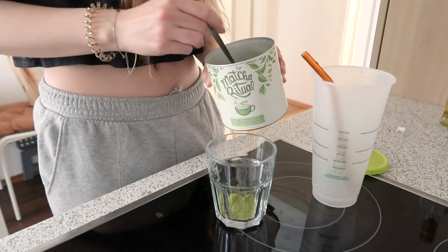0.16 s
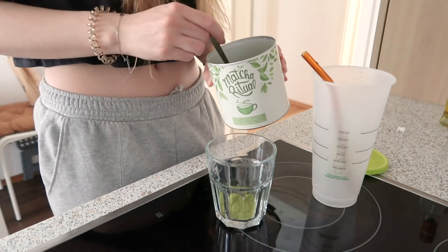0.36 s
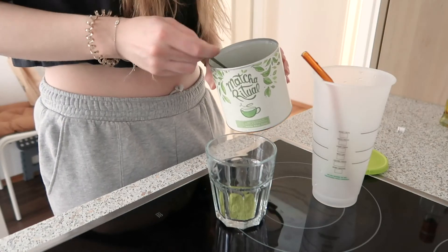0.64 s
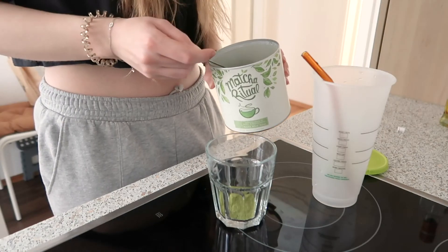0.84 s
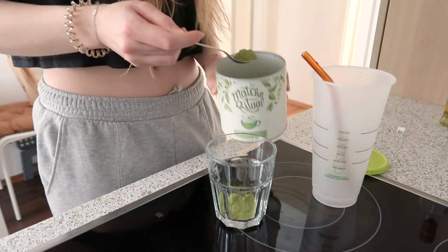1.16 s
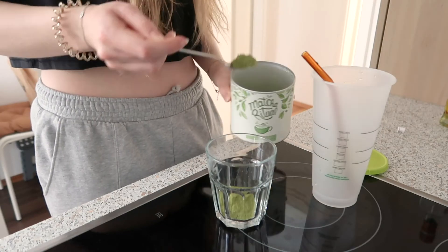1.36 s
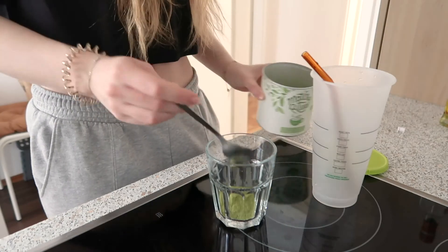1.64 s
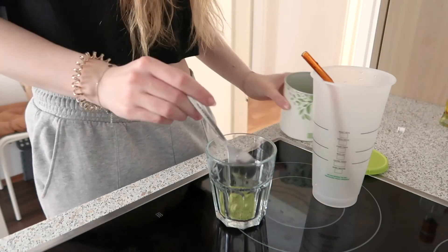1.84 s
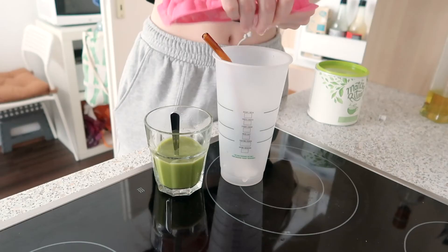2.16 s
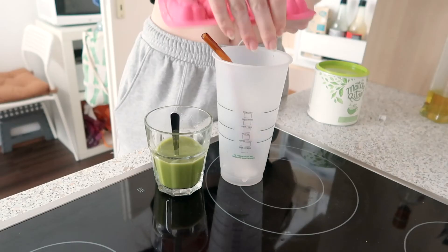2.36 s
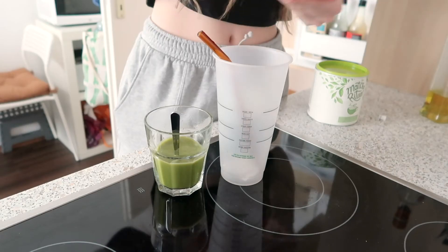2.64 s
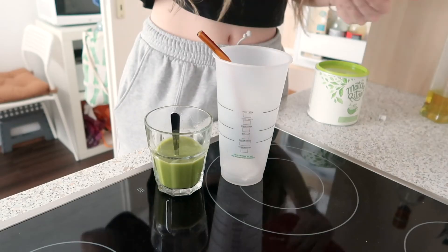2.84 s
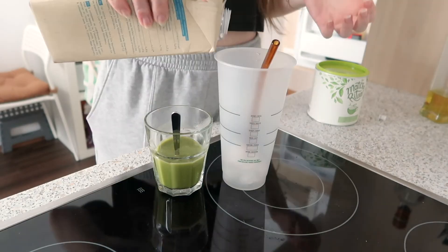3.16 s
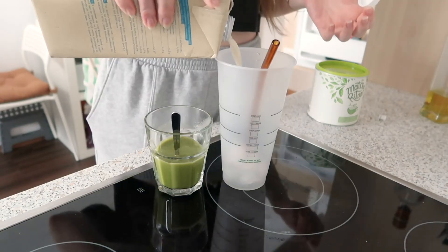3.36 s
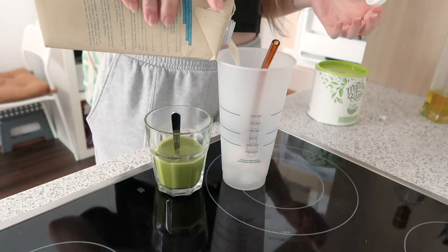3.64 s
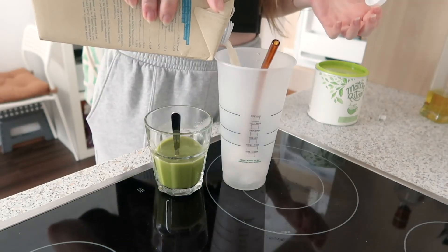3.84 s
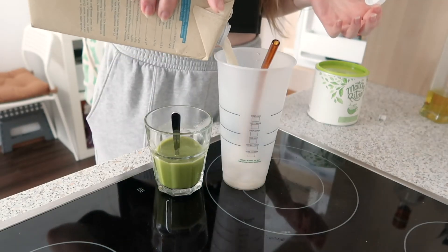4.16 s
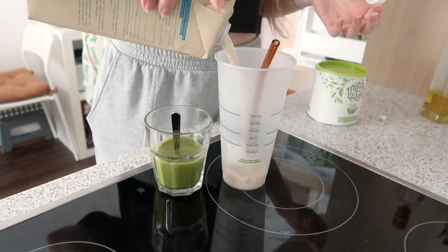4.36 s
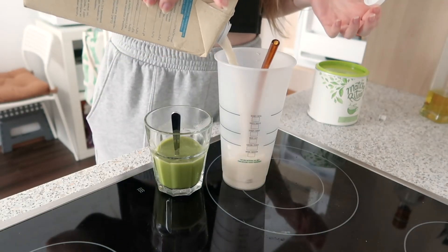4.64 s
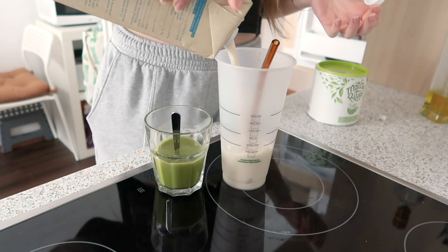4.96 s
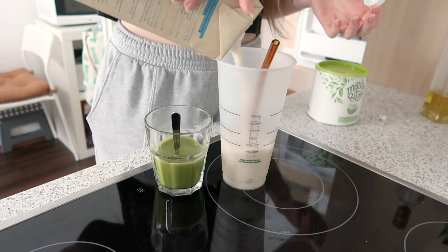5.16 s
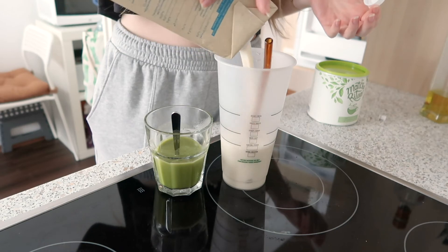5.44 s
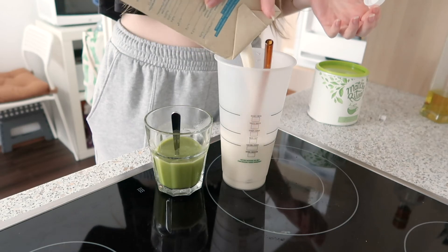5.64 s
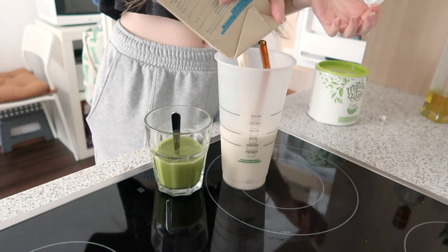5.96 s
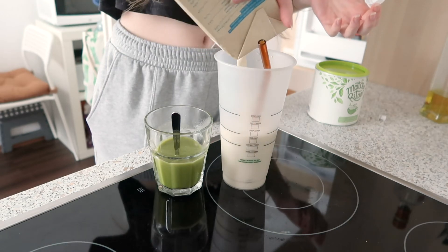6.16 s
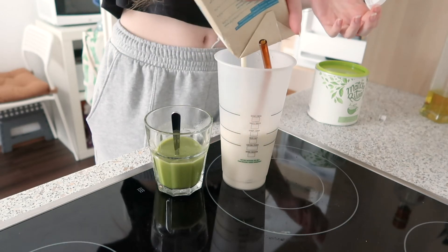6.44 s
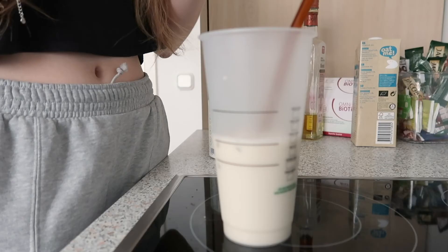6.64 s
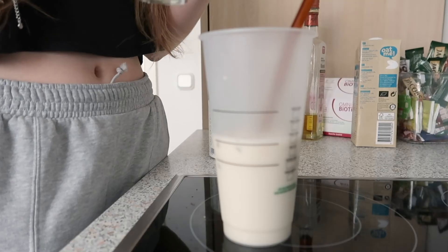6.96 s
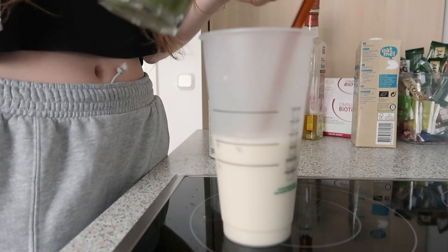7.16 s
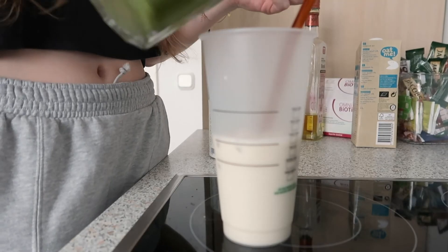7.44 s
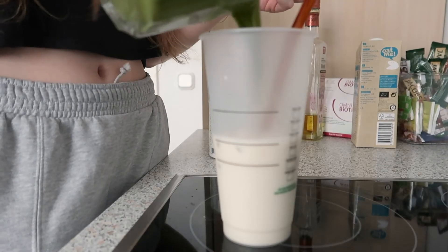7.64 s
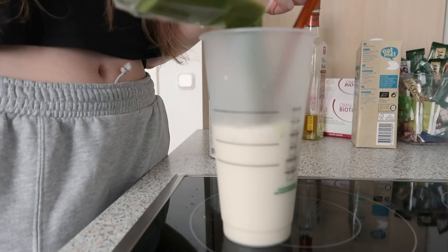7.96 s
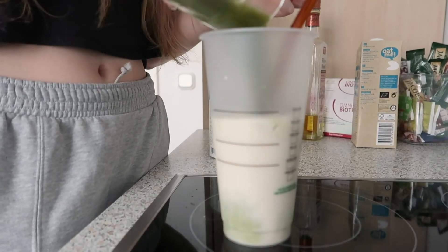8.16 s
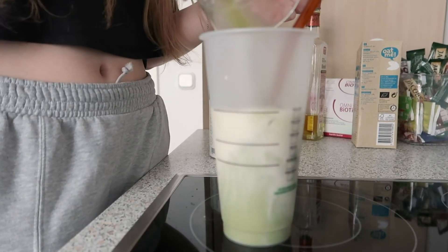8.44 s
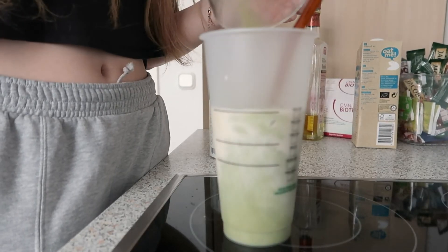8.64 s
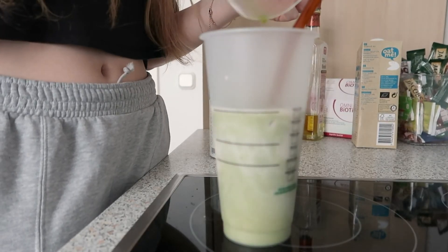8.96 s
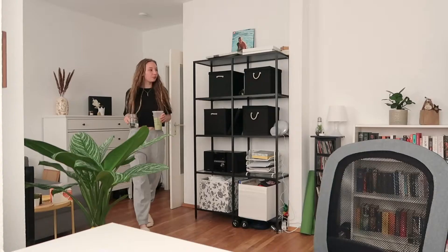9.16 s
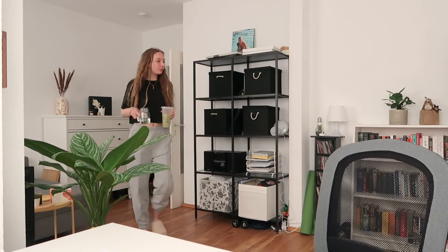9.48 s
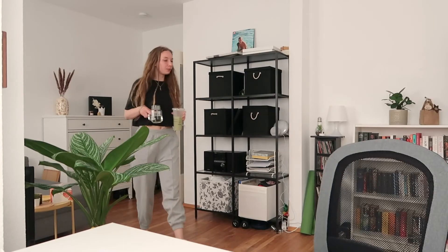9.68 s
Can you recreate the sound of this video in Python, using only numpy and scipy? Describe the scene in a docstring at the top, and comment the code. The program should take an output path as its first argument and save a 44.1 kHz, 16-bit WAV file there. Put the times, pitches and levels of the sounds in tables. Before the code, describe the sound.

Close-up kitchen drink making: spoon scrape, ice clattering in a tall plastic cup, two gurgling pours rising in pitch, a glass clink.

```python
"""Milk, then tea, poured over ice in a tall plastic cup: grains of bubbles, slaps and spray over a low gurgle.
The milk sprays on bare ice, then gurgles once it is covered; filtered noise is the air note, higher as the cup fills.
Before it an appliance rumbles and swishes (noise bands), powder is scooped (grains), and tin and ice land (struck modes).
Ice and straw knock on the wall, single bubbles glide in pitch, a glass clinks, and soft far steps end the scene."""
import sys
import numpy as np
from scipy import signal
from scipy.fft import rfft, irfft, next_fast_len
from scipy.io import wavfile
from scipy.ndimage import uniform_filter1d, map_coordinates

SR = 44100
rng = np.random.default_rng(int(sys.argv[2]) if len(sys.argv) > 2 else 0)


def generate_wav(sig):
    """Save sig (samples, or channels by samples) to the path in sys.argv[1] as 16-bit PCM at SR."""
    pcm = np.round(np.clip(np.atleast_2d(sig).T, -1, 1) * 32767).astype(np.int16)
    wavfile.write(sys.argv[1], SR, pcm)


N = 432621

# air column of the cup as it fills: time_s, pitch_hz
AIR_COLUMN = [(3.6, 520), (4.6, 618), (5.7, 755), (7.87, 840), (7.98, 970), (8.5, 1153)]
# resonances of the cup wall: centre_hz, width_hz, level_db
WALL_MODES = [(1318, 200, 2), (1580, 110, 7), (1820, 110, 3), (2260, 88, 9), (2890, 160, 7.5),
              (3080, 87, -8.5), (4380, 130, -15.5), (5270, 1800, -11.5), (7520, 230, -25)]
# spectrum of a hard contact: freq_hz, level_db
CONTACT_COLOUR = [(30, -41.5), (150, -15), (1000, -3.5), (2500, 3.5), (5000, -5), (9000, -14), (12000, -27),
                  (15000, -31)]
# spectrum of fine milk spray, also of the carton's crackle: freq_hz, level_db
SPRAY_SPECTRUM = [(3000, 3.5), (4500, 4.5), (7000, -4.5), (9500, -8), (13500, -11.5), (16000, -23.5)]
CROSS_HZ = 2536  # air note across the cup, whatever the fill


def amp(db):
    """Amplitude factor of a level in dB."""
    return 10 ** (np.asarray(db) / 20)


def unit(x):
    """Scaled to rms 1."""
    return x / np.sqrt(np.mean(x ** 2) + 1e-20)


def along(points, hz):
    """(Hz, value) points interpolated on a log axis."""
    f, v = np.transpose(points)
    return np.interp(np.log(hz + 1), np.log(f + 1), v)


def curve(rows):
    """(s, value) rows as one value per sample, held at both ends."""
    return np.interp(np.arange(N) / SR, *np.transpose(rows))


def wobble(rate):
    """A smooth random curve, rate knots a second."""
    knots = rng.standard_normal(int(N * rate / SR) + 4)
    return map_coordinates(knots, [np.arange(N) * rate / SR])


def swell(s, db, rise_s, fall_s, hold_s=0, sag_db_per_s=0):
    """A gain that peaks at s, sags while held, then dies; rise and fall are times for 60 dB."""
    t = np.arange(N) / SR - s
    edges = np.minimum(t, 0) / rise_s - np.maximum(t - hold_s, 0) / fall_s
    held = amp(db - sag_db_per_s * np.clip(t, 0, hold_s))
    return held * np.exp(np.log(1000) * np.maximum(edges, -2))


def add(track, s, sound):
    """Mix a sound in at s seconds."""
    part = track[round(s * SR):][:len(sound)]
    part += sound[:len(part)]


def filtered(x, response):
    """x times a complex response of frequency."""
    n = x.shape[-1]
    m = next_fast_len(n + SR // 12)
    return irfft(rfft(x, m) * response(np.fft.rfftfreq(m, 1 / SR)), m)[..., :n]


def coloured(x, spectrum):
    """x with a spectrum, at rms 1."""
    return unit(filtered(x, lambda hz: amp(along(spectrum, hz))))


def body(modes, f):
    """Causal response of a set of resonances, in alternating sign."""
    total = 0
    for k, (centre_hz, width_hz, db) in enumerate(modes):
        damping = 1j * f * width_hz
        total = total + (-1) ** k * amp(db) * damping / (centre_hz * centre_hz - f * f + damping)
    return total


def resonance(x, hz, width_hz):
    """x at rms 1 through a resonance with steep skirts, whose centre follows the curve hz."""
    turn = np.exp(2j * np.pi * np.cumsum(hz) / SR)  # shifts the moving centre to 0 Hz and back
    pole = np.exp(-np.pi * width_hz / SR)
    return unit(np.real(turn * signal.lfilter([1], np.poly([pole, pole]), x / turn)))


def ring(modes):
    """Freely fading modes, at new strengths for each blow."""
    t = np.arange(SR // 2) / SR
    out = np.zeros(len(t))
    for hz, db, t60_s in modes:
        decay = np.exp(-np.log(1000) * t / t60_s)
        out += amp(db + rng.normal(0, 1)) * decay * np.sin(2 * np.pi * hz * t)
    return out


def blow(modes, knock_db, tick_db, chatter, t60_s, crack_db):
    """A contact and its brief chatter through a body; weight sets the low knock, hardness the high tick."""
    t = np.arange(SR // 7) / SR
    force = rng.standard_normal(len(t)) * amp(-60 * t / t60_s)
    force *= chatter / np.linalg.norm(force)
    force[0] += 1
    x = filtered(np.pad(force, (16, 0)),
                 lambda f: body(modes, f) + amp(crack_db + along(CONTACT_COLOUR, f)))
    out = 0
    for kind, hz, db in [('lowpass', 950, knock_db), ('bandpass', (1050, 3600), 0), ('highpass', 3900, tick_db)]:
        band = signal.sosfilt(signal.butter(4, hz, kind, fs=SR, output='sos'), x)
        out = out + amp(db) * band / np.linalg.norm(band)
    return out


def grains(start, end, rate, pitch_hz, spread, cycles, size_db, rise, density):
    """Random short rings at rms 1: bubbles if pitch rises, else grit; fewer and larger where density < 1."""
    count = int((end - start) * rate)
    when, size, pitch, depth, chance = rng.random((count, 5)).T
    hz = np.clip(pitch_hz * (pitch / (1 - pitch)) ** spread, 60, 15500)[:, None]
    t = np.arange(int(min(1.3 * cycles / pitch_hz, .04) * SR)) / SR
    age = np.minimum(hz * t / cycles, 2)
    envelope = (1 - np.exp(-age / .06)) * np.exp(-np.log(1000) * age)
    shape = envelope * np.sin(2 * np.pi * hz * t * (1 + rise * depth[:, None] * age))
    shape *= 1 - t / t[-1]
    sizes = amp(-size_db * np.log(np.maximum(size, .035)))[:, None] * np.sqrt(hz)
    at = ((start + when * (end - start)) * SR).astype(int)[:, None] + np.arange(len(t))
    share = np.broadcast_to(density, N)[at[:, :1]]
    sizes = sizes * (chance[:, None] < share) / np.sqrt(share)
    return unit(np.bincount(at.ravel(), (sizes * shape).ravel(), N)[:N])


def texture(span, spectrum, rate, pitch_hz, spread, cycles, size_db, rise=0, density=1):
    """Coloured grains with rms 1 between two times."""
    start, end = span
    x = grains(start, end, rate, pitch_hz, spread, cycles, size_db, rise, density)
    return coloured(x, spectrum) * np.sqrt((end - start) * SR / N)


def appliance():
    """A turbulent rumble with a narrow drone in its housing, heard only early on."""
    # rumble spectrum: freq_hz, level_db
    rumble_spectrum = [(18, -41.5), (30, -30.5), (56, -11.5), (156, -4.5), (212, -2), (319, -17), (404, -9),
                       (478, -17.5), (700, -26.5), (889, -22), (1300, -29.5), (1780, -28.5), (3300, -46),
                       (9000, -65.5), (11700, -87), (19800, -120)]
    rumble = coloured(rng.standard_normal(N), rumble_spectrum) * amp(-4.5 + 0.64 * wobble(12.32))
    drone = unit(filtered(rng.standard_normal(N), lambda f: body([(214.9, 22.6, 0)], f) ** 2))
    running = swell(0, -31, rise_s=1, fall_s=0.15, hold_s=2.05)
    return running * (rumble + amp(-6.0) * drone)


def room_tone():
    """Steady hiss, mains hum and a thin whine as (mid, side)."""
    # hiss spectrum: freq_hz, level_db
    hiss_spectrum = [(13, -46), (22, -15), (106, 1.5), (205, -8), (457, -11), (569, -15), (837, -15),
                     (1340, -19), (2080, -21.5), (2820, -26), (12800, -43.5), (16000, -65)]
    # gain of the side hiss: freq_hz, level_db
    hiss_width = [(60, -21.5), (380, -0.5), (2380, -4), (15000, 2.5)]
    t = np.arange(N) / SR
    mid, side = (coloured(rng.standard_normal(N), hiss_spectrum) for _ in range(2))
    hum = amp(-11 + 2 * wobble(3)) * np.sin(2 * np.pi * 100 * t)
    whine = amp(-39 + 2 * wobble(15)) * np.sin(2 * np.pi * 13001 * t)
    side = filtered(side, lambda hz: amp(along(hiss_width, hz)))
    return amp(-52.0) * np.array([mid + hum + whine, side])


def swishes():
    """Jets of water sweep round inside the appliance: soft bands of noise that swell, glide and fade."""
    # water jets: peak_s, level_db, pitch_hz, glide_octaves_per_s
    jets = [(.22, -51.5, 1790, 7), (.58, -48.5, 1720, 6), (.73, -47, 1750, -10), (.96, -48, 1790, -2),
            (1.17, -47, 970, -2), (1.401, -50, 1790, 6), (1.58, -49, 1740, 9.5), (1.66, -47.5, 1560, -5)]
    out, t = np.zeros(N), np.arange(-SR // 6, SR // 6) / SR
    for s, db, hz, glide in jets:
        jet = resonance(rng.standard_normal(len(t)), hz * 2 ** (glide * t), width_hz=760)
        add(out, s + t[0], amp(db) * np.exp(-(t / 0.052) ** 2) * jet)
    return out


def tin():
    """The spoon ticks and rasps through powder, then the tin lands on the counter and rings hollow."""
    # powder rasp spectrum: freq_hz, level_db
    scoop_spectrum = [(800, -8), (2200, -1), (5000, -9.5), (10000, -12.5), (15000, -23.5)]
    # spoon touching the tin: start_s, level_db
    spoon_ticks = [(0.5384, -27), (0.6578, -33)]
    # spoon resonances: centre_hz, width_hz, level_db
    spoon_modes = [(2680, 400, -5.5), (3540, 430, 4)]
    # tin on the counter: start_s, level_db, knock_db, tick_db
    landings = [(1.9231, -1, 0.5, -26), (1.9282, -16, 5, -21.5)]
    # tin resonances: centre_hz, width_hz, level_db
    tin_modes = [(210, 220, -11), (670, 101.1, 6.5), (825, 78, 2.5), (1300, 480, -5), (1810, 270, -0.5),
                 (2190, 420, -6.5), (2720, 700, -19.5), (5190, 200, -21.5)]
    dig = swell(0.539, -42.5, rise_s=.008, fall_s=0.38, hold_s=0.078, sag_db_per_s=59)
    out = dig * texture((.4, 1.9), scoop_spectrum, rate=20000, pitch_hz=4350, spread=0.4, cycles=3, size_db=2)
    for s, db in spoon_ticks:
        tick = blow(spoon_modes, knock_db=-17, tick_db=-2, chatter=7, t60_s=0.021, crack_db=-4.5)
        add(out, s, amp(db + 9.5) * tick)
    for s, db, knock_db, tick_db in landings:
        knock = blow(tin_modes, knock_db, tick_db, chatter=0.78, t60_s=0.028, crack_db=-16)
        add(out, s, amp(db + 10.5) * knock)
    hollow = resonance(rng.standard_normal(N), np.full(N, 720), width_hz=190)
    return out + hollow * swell(landings[0][0], -31.5, rise_s=.01, fall_s=.1, hold_s=.14, sag_db_per_s=87)


def kitchen(x):
    """Hard walls answer; each frequency dies at its own speed."""
    # reverberation: freq_hz, t60_s
    decay_times = [(150, 0.6), (600, 0.36), (2500, 0.41), (6000, 0.43), (12000, 0.1)]
    hz, t, z = signal.stft(rng.standard_normal(SR * 3 // 4), SR, nperseg=256)
    fade = amp(-60 * t / along(decay_times, hz)[:, None])
    tail = signal.istft(z * fade, SR, nperseg=256)[1]
    tail *= 1 - np.exp(-np.arange(len(tail)) / SR / 0.0006)
    return signal.fftconvolve(x, tail / np.linalg.norm(tail))[:N]


def cup_modes(s, width_hz, air_db, cross_db, thud_db):
    """The counter's thud, the air along and across the cup, and the wall's resonances at a random spot."""
    detune_share, scatter_db = 0.02, 2.5  # each spot rings a little differently
    spots = rng.standard_normal((len(WALL_MODES), 2))
    modes = [(170, 200, thud_db), (np.interp(s, *np.transpose(AIR_COLUMN)), width_hz, air_db),
             (CROSS_HZ, 90, cross_db)]
    for (hz, wall_width_hz, db), (a, b) in zip(WALL_MODES, spots):
        modes.append((hz * (1 + detune_share * a), wall_width_hz, db + scatter_db * b))
    return sorted(modes)


def ice():
    """Hard cubes knock as they land in the empty cup, bounce and skid to rest."""
    # ice landings: start_s, level_db, knock_db, tick_db, chatter_t60_s
    drops = [(2.0803, -7, -14.5, -15.5, 0.14), (2.4415, -8.5, -0.5, -3.5, 0.068),
             (2.479, -8.5, -15, -7.5, 0.031), (2.486, -11.5, -14.5, -7.5, .05),
             (2.492, -0.5, -0.5, -24.5, 0.032), (2.5876, -13, -1, -11, 0.053), (2.594, -17, 3, -20.5, 0.04),
             (2.603, -10.5, -9, -19.5, 0.055)]
    skid = texture((2.4, 2.85), CONTACT_COLOUR, rate=700, pitch_hz=2900, spread=.5, cycles=1.5, size_db=3.5)
    skid_modes = cup_modes(3.3, width_hz=44, air_db=21.5, cross_db=1.5, thud_db=1.5)
    wall = unit(filtered(skid, lambda f: body(skid_modes, f))) * skid.std()
    rattle = swell(2.475, -30.5, rise_s=0.08, fall_s=0.11, hold_s=0.235, sag_db_per_s=38)
    out = rattle * (amp(4.5) * wall + amp(-7) * skid)
    for s, db, knock_db, tick_db, t60_s in drops:
        modes = cup_modes(s, width_hz=73, air_db=16.5, cross_db=2, thud_db=-3)
        add(out, s, amp(db + 12.5) * blow(modes, knock_db, tick_db, chatter=2.3, t60_s=t60_s, crack_db=5.0))
    return out


def clinks():
    """Hard cubes ring briefly where they strike each other."""
    # cube against cube: start_s, level_db
    strikes = [(2.4423, -9), (2.4815, -10.5), (2.4928, -17)]
    # ringing modes of a cube: pitch_hz, level_db, t60_s
    cube_modes = [(4115, -11, .07), (4360, 0, .12), (4640, -3, .045), (4790, -8, .03), (7130, -14, .05),
                  (10540, -20, .08), (11780, -24, .05)]
    out = np.zeros(N)
    for s, db in strikes:
        add(out, s, amp(db - 6.0) * ring(cube_modes))
    return out


def dip():
    """A gain for the whole level that sinks briefly after the ice and snaps back."""
    t = np.arange(N) / SR
    start_s, end_s = 2.76, 3.08
    level_db = (-4.5 - 22 * (t - start_s)) * (t > start_s) * (t < end_s)
    return amp(uniform_filter1d(level_db, size=900))


def nudges():
    """Floating ice and the straw tap the plastic wall; firm taps crack cleanly, light ones chatter."""
    # taps on the wall: start_s, level_db, tick_db
    taps = [(3.5357, -39, 8.5), (3.8241, -41, 4.5), (3.9149, -32, -17.5), (3.992, -39.5, -2),
            (4.039, -21.5, -28), (4.236, -29.5, -15.5), (4.5998, -10, -11), (5.4163, -25, -18),
            (5.5135, -29, -0.5), (5.548, -21.5, -26), (5.6353, -20.5, -53), (5.689, -18.5, -30),
            (5.7912, -11, -27), (5.86, -11.5, -27), (5.875, -20, -21), (5.9929, -20, -26),
            (6.0166, -20, -21.5), (6.2154, -29, -26), (6.245, -19, -34), (6.2718, -21, -54),
            (6.618, -27, -30), (6.6754, -37, -1.5), (7.781, -34.5, -2), (7.926, -24.5, -27),
            (8.058, -21, -10.5), (8.365, -47.5, 15.5), (8.427, -30, -2), (8.492, -31, -14.5),
            (8.623, -23, -4.5), (8.741, -46, 8), (9.1102, -34, -16)]
    # a fuller cup knocks deeper: air_column_hz, knock_db
    knock_by_fill = [(510, -15), (620, -8), (750, -7.5), (1150, -5)]
    out = np.zeros(N)
    for s, db, tick_db in taps:
        modes = cup_modes(s, width_hz=60, air_db=12, cross_db=8, thud_db=-8)
        knock_db = along(knock_by_fill, np.interp(s, *np.transpose(AIR_COLUMN)))
        chatter = amp(-.5 * db - 7)
        add(out, s, amp(db + 15.5) * blow(modes, knock_db, tick_db, chatter, t60_s=0.055, crack_db=-0.5))
    return out


def carton():
    """The carton crackles faintly as it tips."""
    ticks = texture((3.5, 3.9), SPRAY_SPECTRUM, rate=900, pitch_hz=5500, spread=.35, cycles=6, size_db=4.5)
    return swell(3.63, -55.5, rise_s=0.036, fall_s=0.22, hold_s=0.063) * ticks


def air_column(x, width_hz):
    """The cup's quarter-wave resonance, gliding up with the level of the drink and wavering as it sloshes."""
    return resonance(x, curve(AIR_COLUMN) * (1 + .03 * wobble(16)), width_hz)


def splats():
    """The stream breaks into blobs; each lands with a sharp burst over a steady bed. A gain of rms 1."""
    rate_per_s, decay_s, bed_share = 60, .008, .38  # bed_share: steady part of the power
    lands, size = rng.random((2, N))
    hits = (lands < rate_per_s / SR) * size ** 2
    power = signal.lfilter([1], [1, -np.exp(-1 / (decay_s * SR))], hits)
    return np.sqrt(bed_share + (1 - bed_share) * power / power.mean())


def pour(span, colour, spray_colour, splash, spray, gurgle,
         splash_db, spray_db, gurgle_db, hollow_db, wall_db):
    """A stream splats into the cup: bubbles, slaps, fine spray, low gurgle and the hollow note of the air."""
    # gurgle spectrum: freq_hz, level_db
    gurgle_spectrum = [(40, 1), (100, 7.5), (250, -1), (500, -6), (900, 3.5)]
    density = np.clip(splash / splash.max(), .3, 1)  # a thin stream makes fewer bubbles
    bubbles = texture(span, colour, rate=950, pitch_hz=2150, spread=.3, cycles=42,
                      size_db=3.4, rise=.06, density=density)
    slaps = texture(span, colour, rate=1200, pitch_hz=1900, spread=.35, cycles=5,
                    size_db=3.5, density=density)
    drops = texture(span, spray_colour, rate=4200, pitch_hz=6200, spread=.36, cycles=32,
                    size_db=3.4, rise=.03, density=density)
    churn = texture(span, gurgle_spectrum, rate=330, pitch_hz=370, spread=0.45, cycles=13,
                    size_db=4.5, rise=0.25)
    bursts = splats()
    modes = sorted(WALL_MODES + [(CROSS_HZ, 90, 8)])
    wall = unit(filtered(slaps * bursts, lambda f: body(modes, f))) * slaps.std()  # blobs drum on ice and wall
    hollow = air_column(rng.standard_normal(N), width_hz=140) * amp(4 * wobble(25))
    wet = amp(splash_db) * bubbles + amp(wall_db) * (wall + .5 * slaps * bursts)
    stir = np.sqrt(splash * gurgle)  # splashing and deep churning both drive the air column
    out = splash * wet
    out += amp(spray_db) * spray * bursts * drops
    out += amp(gurgle_db) * gurgle * churn
    return out + amp(hollow_db) * stir * hollow


def milk():
    """The stream sprays on bare ice, gurgles once a pool covers it, and comes partly in spurts."""
    # flow of the stream: time_s, level_db
    stream = [(3.7, -90), (4.15, -58.5), (4.4, -52), (4.46, -43), (4.6, -35.5), (4.82, -35), (4.92, -44.5),
              (5.2, -52), (5.6, -45), (5.88, -44.5), (6.17, -56)]
    # the carton gulps air and lets out a spurt: peak_s, level_db
    spurts = [(4.26, -48.5), (5.06, -54), (5.347, -44.5), (5.95, -47), (6.28, -47.5), (6.54, -50)]
    # milk splash spectrum: freq_hz, level_db
    milk_spectrum = [(400, -32), (620, -23), (950, -11.5), (1500, 3.5), (2100, 0.5), (2800, 6.5),
                     (4200, 4.5), (6000, -10.5)]
    s, db = np.transpose(stream)
    t = np.arange(N) / SR
    flow = amp(np.interp(t, s, db, left=-120, right=-120))
    flow += sum(swell(at, level, rise_s=0.2, fall_s=0.3, hold_s=0.011) for at, level in spurts)
    covered_s, covering_s = 5.29, 0.32  # when the milk closes over the ice, and how gradually
    covered = (1 + np.tanh((t - covered_s) / (2 * covering_s))) / 2
    spray = flow * amp(1.5 + (-25.5 - 1.5) * covered)  # dB on bare ice to dB in the pool
    gurgle = flow * amp(-19 + (3.5 + 19) * covered)
    return pour((3.6, 6.8), milk_spectrum, SPRAY_SPECTRUM, flow, spray, gurgle,
                splash_db=-6.5, spray_db=-3.5, gurgle_db=-2.5, hollow_db=-8.5, wall_db=-7.0)


def glugs():
    """Single bubbles, deep glugs to small plips, swell softly, glide in pitch and die away."""
    # loud bubbles: start_s, level_db, pitch_hz, fade_s, pitch_rise_share (over fade_s)
    loud_bubbles = [(3.993, -29, 3230, 0.012, 0.11), (4.454, -25.5, 2630, 0.013, -0.009),
                    (4.539, -31, 2800, 0.016, -0.028), (4.731, -29, 2920, 0.032, -0.13),
                    (4.988, -34.5, 2525, 0.028, 0.18), (5.027, -39, 2540, 0.025, .15),
                    (5.237, -32, 106, 0.035, 0), (5.322, -33, 98, 0.033, -0.32),
                    (5.608, -32, 606, 0.042, 0.3), (5.638, -29, 2510, 0.037, -0.065),
                    (5.763, -22.5, 3200, 0.015, -0.19), (5.779, -20.5, 3260, 0.011, .06),
                    (5.839, -26.5, 690, 0.075, -.45), (5.862, -29.5, 450, 0.043, 0.31),
                    (5.869, -26.5, 132, 0.044, -0.29), (5.876, -31, 256, 0.077, 0.23),
                    (5.943, -32, 3260, 0.02, 0.26), (5.96, -35, 613, .04, 0.26),
                    (7.837, -30, 2960, 0.025, -0.14), (7.858, -26, 823, 0.05, -0.31),
                    (7.963, -32, 967, 0.053, 0.066), (8.061, -32, 112, 0.052, -0.27),
                    (8.375, -45, 1650, 0.14, 1.8), (8.425, -35, 1240, 0.028, 0.36),
                    (8.52, -44, 2140, 0.034, 1.5)]
    out, t = np.zeros(N), np.arange(SR // 5) / SR
    for s, db, hz, fade_s, rise in loud_bubbles:
        age = 9 * t / fade_s
        tone = np.sin(2 * np.pi * hz * t * (1 + rise * t / fade_s / 2))
        add(out, s, amp(db) * age * np.exp(1 - age) * tone)
    return out


def tea():
    """One steady tip of the glass: the tea plunges in at once and thins as the glass empties."""
    # tea splash spectrum: freq_hz, level_db
    tea_spectrum = [(500, 3), (950, 3.5), (1600, -7), (2500, 0), (3500, 6.5), (5000, -3), (7000, -12.5)]
    # tea spray spectrum: freq_hz, level_db
    fizz_spectrum = [(2000, -5.5), (4000, 7.5), (7000, -3.5), (13500, -7)]
    start_s = 7.86
    flow = swell(start_s, -38, rise_s=0.19, fall_s=0.61, hold_s=0.63, sag_db_per_s=7.5)
    spray = flow * swell(8.135, -5.5, rise_s=1.5, fall_s=1.0)  # most spray at the steepest tilt
    gurgle = flow * swell(start_s, -2, rise_s=0.22, fall_s=6.0)  # the first plunge churns deepest
    return pour((7.7, 8.9), tea_spectrum, fizz_spectrum, flow, spray, gurgle,
                splash_db=-4.0, spray_db=0.0, gurgle_db=-3.5, hollow_db=-12.5, wall_db=-11.5)


def glass():
    """The emptied glass clinks once in fading modes, between two light, high ticks."""
    # ringing modes of the glass: pitch_hz, level_db, t60_s
    glass_modes = [(2484, 0, .12), (5259, -16, .11), (8900, -24, .1)]
    # light touches on the glass: start_s, level_db
    touches = [(8.366, -36), (8.742, -36)]
    out = np.zeros(N)
    add(out, 8.626, amp(-23) * ring(glass_modes))
    for s, db in touches:
        add(out, s, amp(db) * ring([(5930, 0, 0.036)]))
    return out


def footfall():
    """Soft steps across the room: swells of low noise."""
    # far footfalls: peak_s, level_db
    footsteps = [(9.27, -51), (9.399, -47)]
    # footfall spectrum: freq_hz, level_db
    step_spectrum = [(50, 18.5), (200, 4.5), (850, 4.5), (1500, -5), (3000, -6.5), (8000, -29.5)]
    steps = sum(swell(s, db, rise_s=0.19, fall_s=0.42, hold_s=0.027) for s, db in footsteps)
    return steps * coloured(rng.standard_normal(N), step_spectrum)


def scene():
    """Close microphone ports: near mono in the bass, the right one slightly ahead in the treble."""
    # stereo width: freq_hz, side_over_mid_db
    stereo_width = [(100, -57.5), (500, -27), (1000, -22.5), (2000, -21), (4000, -9.5), (6000, -3),
                    (8000, -0.5), (12000, 10.5), (16000, -2.5)]
    hard = tin() + ice()
    wet = nudges() + glugs() + carton() + milk() + tea()
    clink = clinks() + glass()
    direct = hard + wet + clink + footfall() + appliance() + swishes()
    send = amp(-8.5) * hard + amp(-9.0) * wet + amp(-18.5) * clink
    mid = direct + kitchen(send)
    side = filtered(direct + amp(3.5) * kitchen(send), lambda hz: -1j * amp(along(stereo_width, hz)))
    side -= 0.053 * (hard + wet)  # the cup stands a little to the right
    mid, side = (np.array([mid, side]) + room_tone()) * amp(1) * dip()
    return np.array([mid + side, mid - side])


def record(dry):
    """The input clips at full scale and keeps nothing above its band limit."""
    top_hz = 15700
    return filtered(np.clip(dry, -1, 1), lambda hz: hz < top_hz)


dry = scene()
out = record(dry)
generate_wav(out)
```